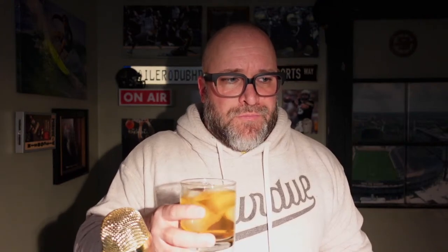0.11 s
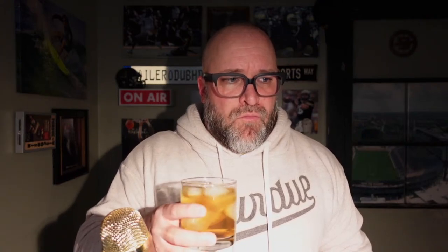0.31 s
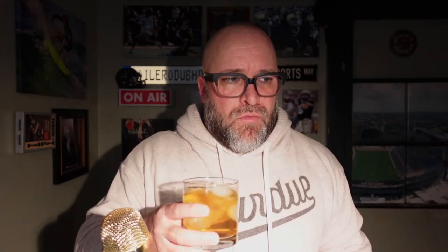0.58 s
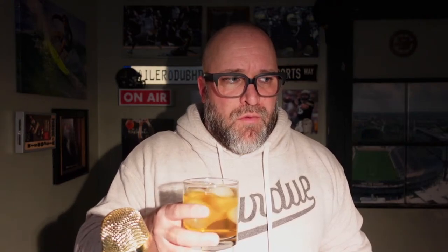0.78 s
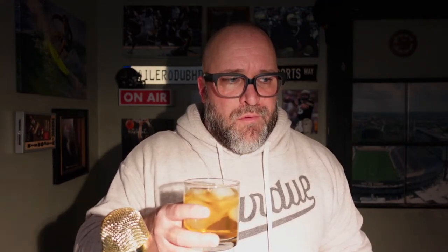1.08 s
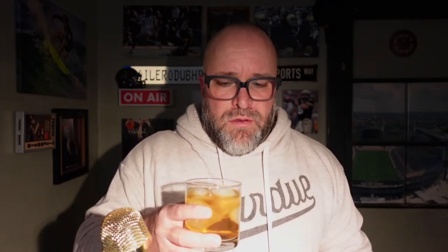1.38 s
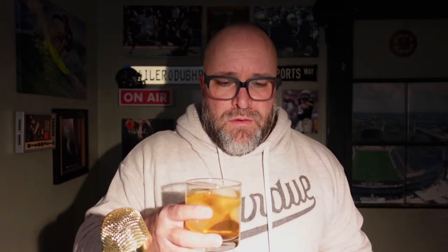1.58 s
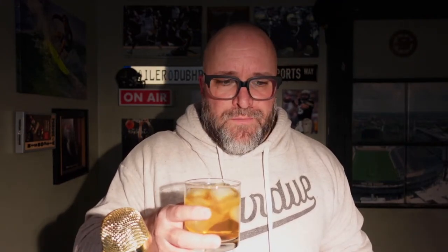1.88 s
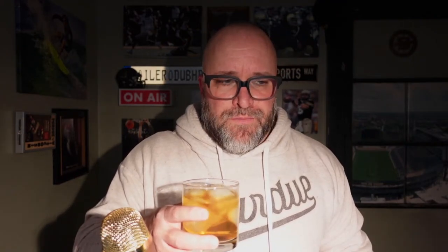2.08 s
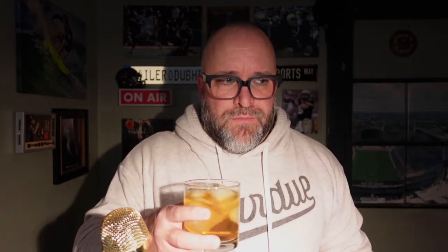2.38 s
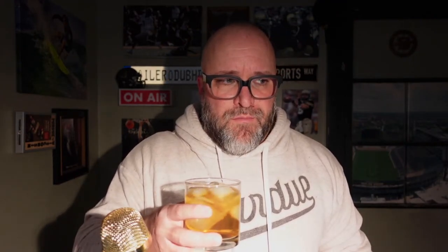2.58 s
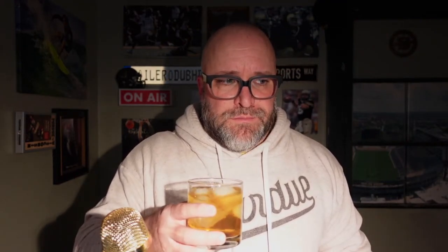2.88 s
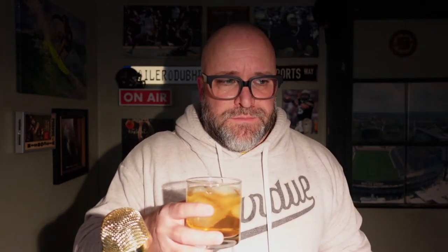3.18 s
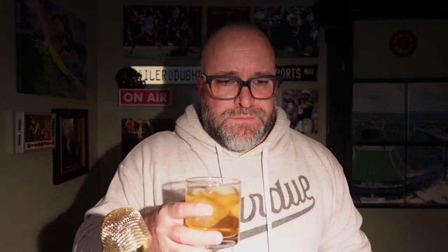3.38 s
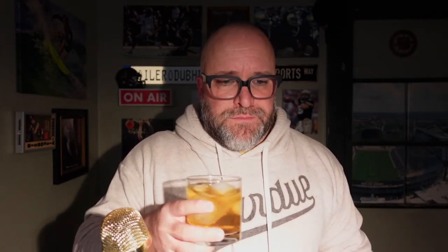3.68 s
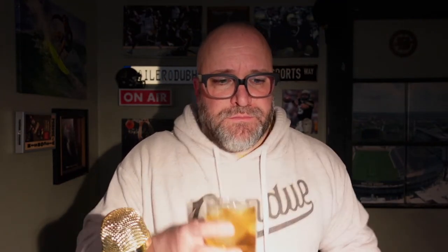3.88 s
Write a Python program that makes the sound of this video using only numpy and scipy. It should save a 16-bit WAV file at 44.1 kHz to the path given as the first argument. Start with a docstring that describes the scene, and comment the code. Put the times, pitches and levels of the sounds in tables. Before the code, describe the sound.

Ice cubes rattle in a tumbler of drink being swirled, one loud clink early, then light chatter and growing, more frequent clinks toward the end; quiet room, close microphone, little echo.

```python
"""A quiet room: up close, ice cubes rattle in a hand-held tumbler of drink as it is swirled.
Each knock adds two fading rings of the glass, a blunt push, short thud and tick tones, and a noisy crack.
Random small knocks chatter between the listed ones, and more loudly after sharp ticks.
Dull glugs are short low tones with rough noise; murmur and rumble are swelling bands of noise.
Faint room air with a wavering hum lies underneath, and the glass gets a short room echo."""
import sys
import numpy as np
from scipy import signal
from scipy.fft import rfft, irfft
from scipy.io import wavfile
from scipy.ndimage import uniform_filter1d

SR = 44100
rng = np.random.default_rng(int(sys.argv[2]) if len(sys.argv) > 2 else 0)


def int16_out(signal):
    """Quantize to a 16-bit WAV file."""
    q = np.round(np.clip(np.atleast_2d(signal).T, -1, 1) * 32767)
    wavfile.write(sys.argv[1], SR, q.astype(np.int16))


N = 176400

# Knocks of ice on glass: start_s, low_ring_db, upper_ring_db, tick_db
ICE_KNOCKS = [(0.007, -53, -49, -54), (0.0224, -65, -52, -46.5), (0.0492, -43.5, -43, -39.5),
              (0.0982, -42, -44, -47), (0.1138, -44, -48, -38), (0.1242, -44, -36, -37.5),
              (0.207, -19.5, -28, -23), (0.2372, -37.5, -52, -51), (0.2623, -47, -45, -35.5),
              (0.2809, -58, -44.5, -36), (0.2948, -36.5, -34.5, -35), (0.3048, -59, -39.5, -52),
              (0.3388, -56, -44, -51), (0.3647, -47, -42.5, -53), (0.4207, -46.5, -49, -60),
              (0.4408, -53, -41, -62), (0.4551, -42, -42.5, -47), (0.5251, -52, -38.5, -41),
              (0.5471, -54, -37, -45), (0.5917, -46, -41, -47.5), (0.6428, -72, -55, -39.5),
              (0.6937, -54, -37, -43.5), (0.7314, -46.5, -43.5, -56), (0.7584, -43, -41, -42.5),
              (0.828, -51, -54, -65), (0.8364, -46, -48.5, -76), (0.8459, -43.5, -46.5, -51),
              (0.8984, -48, -43.5, -33.5), (0.9096, -76, -55, -46.5), (0.926, -71, -55, -55),
              (0.9423, -40.5, -41, -35.5), (1.0288, -34.5, -35, -36.5), (1.0948, -47, -64, -71),
              (1.1199, -47, -44, -39.5), (1.1355, -46, -71, -48), (1.1477, -81, -45, -45.5),
              (1.17, -55.5, -50, -57.5), (1.2242, -42, -46, -48.5), (1.2426, -41, -47, -45.5),
              (1.3302, -44, -44, -49), (1.4195, -45.5, -45, -40), (1.4814, -79, -49, -42),
              (1.5244, -45.5, -43.5, -53), (1.5407, -48, -55, -42), (1.5716, -46.5, -62, -43),
              (1.6091, -43, -44, -46), (1.6233, -35, -36, -39), (1.6598, -45, -45.5, -53),
              (1.7079, -59, -65, -35.5), (1.7223, -48, -39.5, -36), (1.7328, -44, -43.5, -44),
              (1.7483, -46.5, -43.5, -47), (1.7849, -37, -46, -48), (1.838, -55, -55, -49),
              (1.855, -40, -44, -44), (1.8748, -23.5, -33.5, -32), (1.9219, -42, -48, -30.5),
              (1.9415, -48.5, -58, -39), (1.9567, -50, -42.5, -40), (2.002, -49.5, -43, -49),
              (2.0437, -41.5, -42.5, -51.5), (2.0732, -40.5, -41, -39), (2.0816, -77, -61, -34.5),
              (2.0948, -33.5, -35.5, -39), (2.118, -48.5, -50, -33.5), (2.1597, -44, -35.5, -38.5),
              (2.217, -66, -68, -64), (2.2358, -41, -38, -44), (2.272, -29, -35.5, -38),
              (2.2946, -71, -50, -29.5), (2.3027, -65, -36.5, -46), (2.3127, -45, -33, -49),
              (2.3197, -66, -45, -34.5), (2.338, -45.5, -59, -68), (2.3984, -46, -48, -49),
              (2.4417, -55, -38, -35.5), (2.4547, -32.5, -41, -41), (2.4945, -40, -47, -34.5),
              (2.499, -49, -38, -41.5), (2.508, -48, -54, -44), (2.5678, -36, -49, -40),
              (2.595, -26, -30.5, -28), (2.6679, -63, -60, -34.5), (2.6868, -45, -73, -35),
              (2.699, -75, -51, -64), (2.7596, -43.5, -63, -66), (2.7798, -41, -38, -45),
              (2.7931, -28, -32, -33.5), (2.8575, -43, -48, -35.5), (2.979, -44.5, -49, -50.5),
              (3.0166, -34.5, -34.5, -35), (3.037, -37.5, -61, -36.5), (3.0954, -44.5, -49, -70),
              (3.163, -34.5, -31, -38), (3.1853, -42.5, -40.5, -45.5), (3.2361, -51, -46, -43.5),
              (3.256, -51, -39, -33), (3.2716, -53, -48, -37), (3.2982, -44.5, -33, -38.5),
              (3.3928, -25.5, -25.5, -29.5), (3.4301, -43.5, -66, -77), (3.4475, -46, -53, -42),
              (3.4637, -54, -39, -36), (3.4907, -77, -41, -41.5), (3.4963, -39, -45, -48),
              (3.5026, -67, -37, -41), (3.5323, -55, -45.5, -55), (3.5544, -62, -82, -51.5),
              (3.583, -50, -73, -71), (3.599, -37.5, -38, -34.5), (3.6256, -39.5, -34.5, -67),
              (3.6432, -25.5, -29.5, -30.5), (3.673, -58, -49, -47), (3.6883, -69, -45, -38.5),
              (3.7183, -52, -39, -42), (3.734, -37.5, -32.5, -40), (3.8481, -43, -39, -45),
              (3.8864, -58, -51, -56), (3.9287, -51.5, -44, -50), (3.9451, -69, -48, -42),
              (3.9844, -50, -40, -35.5)]
# Fingers hold the glass tighter or looser, so the low ring lasts less or more: time_s, t60_s
FINGER_GRIP = [(0, 0.067), (1.4, 0.047), (2.3, 0.05), (2.47, 0.083), (2.6, 0.099), (3.1, 0.089),
               (3.4, 0.056), (3.64, 0.043), (3.75, .1)]
# Moments when the drink slops furthest up the wall and the glass rings lowest: time_s
SLOP_TIMES = [0, .22, .41, .62, .88, 1.13, 1.26, 1.44, 1.64, 1.87, 2.09, 2.28, 2.46, 2.62, 2.8, 3.02, 3.19,
              3.39, 3.62, 3.87, 4.06]
# Short tones struck by each tick: pitch_hz, level_db (against the tick), t60_s
TICK_TONES = [(3450, -4.5, 0.0034), (4220, -3.5, 0.0069), (9480, -20, 0.0073)]
# Short tones that go with the upper ring: pitch_hz, level_db (against the upper ring), t60_s
THUD_TONES = [(2114, -7, 0.012)]
# Where the dull, middle and bright noise bands of a crack lie: pitch_hz
CRACK_BANDS = [3334, 5990, 10480]
# Dull glugs and the closing thump: start_s, tone_peak_db, pitch_hz, length_s
GLUG_BURSTS = [(1.101, -50, 594, 0.0051), (1.607, -55.5, 296.4, 0.063), (1.624, -52, 270, 0.025),
               (1.635, -62.5, 301, 0.11), (1.728, -62, 275, 0.048), (3.851, -63, 187, 0.057)]
# The drink murmurs softly as it swirls: start_s, level_db, length_s
MURMUR_SWELLS = [(0, -71, 0.23), (.5, -75.5, 0.16), (1.95, -72, 0.31)]
# Lower and upper edge of the murmur: pitch_hz
MURMUR_BAND = [462, 735]
# Gusts of rumble: start_s, level_db, length_s
RUMBLE_GUSTS = [(0, -66.5, 0.2), (0.197, -55.5, 0.18), (0.573, -57, 0.26), (0.91, -63, 0.42)]
# Loudness curve of the room air: pitch_hz, level_db (per Hz)
ROOM_AIR = [(20, -86.5), (60, -103), (150, -95), (300, -108), (650, -108), (1000, -115), (8000, -128),
            (16000, -134)]

# A t60 is the time in seconds for a sound to fade by 60 dB; a spread is the size of a random change.
SPAN, SHORT = 6000, 1500  # samples of a knock and of its tick
LOW_HZ, LOW_SWING_HZ = 1716, 30
UPPER_HZ, UPPER_SWING_HZ, UPPER_SPREAD, UPPER_T60 = 2635, 25, 0.01, 0.023
DAMPING_SPREAD = 0.04  # the ice damps each low ring a little differently
RISE_S, CONTACT_S = 0.00025, 0.00053  # onset times of the rings and of the tick
PUSH_DB, PUSH_S = -8.5, 0.00023  # blunt shove of the cube, against the low ring
TICK_SPREAD_DB, TICK_DETUNE, TILT_SPREAD_DB = 7.5, 0.045, 1.5
CRACK_DB, CRACK_T60 = -5.5, 0.0048  # level against the tick
CRACK_TAIL_DB, CRACK_TAIL_T60 = -18.5, 0.032  # level against the crack
GRAZE_S, GRAZE_DB = 0.0029, -22  # typical lead and level of a light touch before the knock
SLOTS, CHATTER_PER_S = 800, 150  # chances for a chatter knock, and average rate
CHATTER_DB, CHATTER_SPREAD_DB, CHATTER_TICK_DB = -60.5, 6, -0.5
FOLLOW, FOLLOW_S, FOLLOW_FROM_DB = 0.56, 0.023, -43  # how chatter follows the recent tick power
GLUG_ROUGH = 0.35  # share of noise beside the tone
RUMBLE_LOW_HZ, RUMBLE_HIGH_HZ = 14, 39
HUM_HZ, HUM_DB = 123, -82.5
ROOM_DB, ROOM_T60, ROOM_TREBLE_T60 = -17.5, 0.14, 0.1
EDGE_HZ = 16300


def ice():
    """Cubes hit the glass in listed knocks, each after a light graze, with chatter between."""
    out, tick_power = np.zeros(N), np.zeros(N)
    rings = slosh(LOW_HZ, LOW_SWING_HZ), slosh(UPPER_HZ, UPPER_SWING_HZ)
    noise = crack_noise()
    luck_count = 4 + 2 * len(THUD_TONES + TICK_TONES)
    graze_fade = amp(GRAZE_DB) * np.hanning(2 * SHORT)[SHORT:] ** 20
    for row, luck in zip(ICE_KNOCKS, rng.standard_normal((len(ICE_KNOCKS), luck_count))):
        start_s, tick_db = row[0], row[3]
        sound = knock(*row, rings, luck, noise)
        add(out, start_s, sound)
        lead_s = GRAZE_S * np.exp(0.23 * luck[-1].clip(-2, 2))
        add(out, start_s - lead_s, sound[:SHORT] * graze_fade)
        add(tick_power, start_s, amp([2 * tick_db]))  # doubled dB gives power
    return out + chatter(tick_power, rings, noise, luck_count)


def knock(start_s, low_db, upper_db, tick_db, rings, luck, noise):
    """A blow shoves the glass, sets two fading rings going and makes a tick at its start."""
    t, at = np.arange(SPAN) / SR, round(start_s * SR)
    low, upper = (phase[at:at + SPAN] - phase[at] for phase in rings)
    low_t60 = np.interp(start_s, *np.transpose(FINGER_GRIP))
    low_fade_db = -60 * t / low_t60 * np.exp(DAMPING_SPREAD * luck[-2])
    low_ring = amp(low_db + low_fade_db) * np.sin(low)
    upper_ring = amp(upper_db - 60 * t / UPPER_T60) * np.sin(upper * (1 + UPPER_SPREAD * luck[0]))
    push_level = amp(low_db + PUSH_DB + TILT_SPREAD_DB * luck[1].clip(-2, 1))
    push = push_level * (1 - t / PUSH_S) * np.exp(-t / PUSH_S)
    out = (low_ring + upper_ring + push) * (1 - np.exp(-t / RISE_S))

    t = t[:SHORT]
    sharp = tick(upper_db, tick_db, luck, t) + crack(tick_db, luck, noise[:, at:at + SHORT], t)
    out[:SHORT] += sharp * np.sin(np.pi / 2 * np.minimum(t / CONTACT_S, 1)) ** 2
    return out


def tick(upper_db, tick_db, luck, t):
    """Short glass tones whose pitch and level vary with the spot struck."""
    hz, db, t60 = np.transpose(THUD_TONES + TICK_TONES)[:, :, None]
    blow_db = np.repeat([upper_db, tick_db], [len(THUD_TONES), len(TICK_TONES)])[:, None]
    detune, level = luck[4:].reshape(2, -1, 1)
    tone_db = blow_db + db + TICK_SPREAD_DB * level
    tones = ring(hz * (1 + TICK_DETUNE * detune), tone_db, t60, t)
    return tones.sum(0) * np.sign(luck[0])  # the first swing goes either way


def crack(tick_db, luck, noise, t):
    """Three bands of noise in a random balance fade fast, then leave a softer tail."""
    fade = amp(-60 * t / CRACK_T60) + amp(CRACK_TAIL_DB - 60 * t / CRACK_TAIL_T60)
    return fade * (amp(tick_db + CRACK_DB + TILT_SPREAD_DB * luck[1:4]) @ noise)


def crack_noise():
    """Make dull, middle and bright bands of noise, weaker as the pitch rises."""
    bands = []
    for hz in CRACK_BANDS:
        noise = band(rng.standard_normal(N + SPAN), 2, hz / 1.59, hz * 1.177)
        bands.append(evened(noise) * CRACK_BANDS[0] / hz)
    return np.array(bands)


def slosh(hz, swing_hz):
    """The running phase of a ring whose pitch dips each time the drink slops up the wall."""
    turn = np.interp(np.arange(N + SPAN) / SR, SLOP_TIMES, np.arange(len(SLOP_TIMES)))
    return 2 * np.pi * np.cumsum(hz - swing_hz * np.cos(2 * np.pi * turn)) / SR


def chatter(tick_power, rings, noise, luck_count):
    """Random small knocks grow louder in the fading wake of sharp ticks."""
    out = np.zeros(N)
    wake = signal.lfilter([1], [1, -np.exp(-1 / (FOLLOW_S * SR))], tick_power)
    busy_db = 10 * np.log10(wake + amp(-130))
    slots = rng.random((SLOTS, 2))
    slot_s = N / SR / SLOTS
    for k, luck in enumerate(rng.standard_normal((SLOTS, 3 + luck_count))):
        chance, place = slots[k]
        start_s = (k + place) * slot_s
        if chance < CHATTER_PER_S * slot_s:
            follow_db = FOLLOW * (busy_db[int(start_s * SR)] - FOLLOW_FROM_DB)
            low_db, upper_db, tick_db = CHATTER_DB + follow_db + CHATTER_SPREAD_DB * luck[:3]
            sound = knock(start_s, low_db, upper_db, tick_db + CHATTER_TICK_DB, rings, luck[3:], noise)
            add(out, start_s, sound)
    return out


def glugs():
    """Soft low tone bursts swell and fade with a rough, noisy body."""
    out = np.zeros(N)
    bursts = zip(GLUG_BURSTS, rng.standard_normal((len(GLUG_BURSTS), SPAN)))
    for (start_s, db, hz, length_s), noise in bursts:
        t = np.arange(0, length_s, 1 / SR)
        body = evened(band(noise, 1, hz / 1.25, hz * 2.86))[:len(t)]
        swell = np.sin(np.pi * (t / t[-1]) ** 0.46) ** 2  # rises faster than it falls
        add(out, start_s, amp(db) * swell * (np.sin(2 * np.pi * hz * t) + GLUG_ROUGH * body))
    return out


def murmur():
    """The swirling drink gives soft swells of mid-low noise."""
    return swells(MURMUR_SWELLS, *MURMUR_BAND)


def rumble():
    """Very low noise comes in gusts."""
    return swells(RUMBLE_GUSTS, RUMBLE_LOW_HZ, RUMBLE_HIGH_HZ)


def swells(rows, low_hz, high_hz):
    """Lumpy band noise swells and fades at each row."""
    noise = band(rng.standard_normal(N), 3, low_hz, high_hz)
    level = np.zeros(N)
    for start_s, db, length_s in rows:
        add(level, start_s, amp(db) * np.sqrt(np.hanning(int(length_s * SR))))
    return evened(noise) * level


def air():
    """Steady noise shaped by the air curve, with a faint hum of wavering level."""
    hz, (curve_hz, curve_db) = np.fft.rfftfreq(N, 1 / SR), np.transpose(ROOM_AIR)
    shape = amp(np.interp(np.log(hz + 1), np.log(curve_hz), curve_db)) * np.sqrt(SR / 2)
    noise = irfft(rfft(rng.standard_normal(N)) * shape, N)
    waver = 1 + 0.75 * evened(uniform_filter1d(rng.standard_normal(N), SPAN))
    return noise + amp(HUM_DB) * waver * np.sin(2 * np.pi * HUM_HZ * np.arange(N) / SR)


def room(x):
    """Echoes arrive as sparse random taps, and their treble dies sooner."""
    taps = np.zeros(2 * SPAN)
    at = np.arange(120, len(taps) - 20, 20)
    taps[at + rng.integers(0, 20, len(at))] = rng.choice([-1., 1.], len(at))
    dull = signal.sosfilt(signal.butter(2, 3500, fs=SR, output="sos"), taps)
    t = np.arange(len(taps)) / SR
    tail = dull * amp(-60 * t / ROOM_T60) + (taps - dull) * amp(-60 * t / ROOM_TREBLE_T60)
    return signal.fftconvolve(x, tail / np.linalg.norm(tail))[:N]


def amp(db):
    """Turn decibels into a plain multiplier."""
    return 10 ** (np.asarray(db) / 20)


def evened(x):
    """Scale a sound to an average (RMS) strength of one."""
    return x / np.sqrt(np.mean(x ** 2) + 1e-20)


def band(x, order, low_hz, high_hz):
    """Keep mainly the pitches between two edges."""
    return signal.sosfilt(signal.butter(order, [low_hz, high_hz], "band", fs=SR, output="sos"), x)


def ring(hz, db, t60, t):
    """Struck tones are sine waves that fade steadily in decibels, one per row."""
    return amp(db - 60 * t / t60) * np.sin(2 * np.pi * hz * t)


def add(mix, start_s, sound):
    """Lay a sound into the mix, cut off at the end of the mix."""
    part = mix[round(start_s * SR):][:len(sound)]
    part += sound[:len(part)]


def scene():
    """The glass and its echo sound over air, rumble and murmur."""
    glass = ice() + glugs()
    echo = amp(ROOM_DB) * room(glass)
    return (glass + echo + air() + rumble() + murmur())[None]


def record(dry):
    """A steep filter removes the highest treble."""
    low_pass = signal.firwin(511, EDGE_HZ, window=("kaiser", 9), fs=SR)
    return signal.oaconvolve(dry, low_pass[None], "same")


dry = scene()
out = record(dry)
int16_out(out)
```